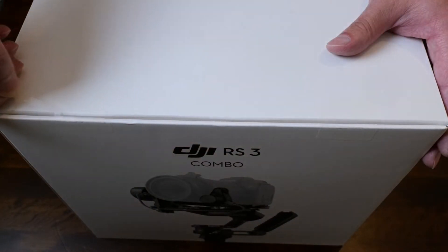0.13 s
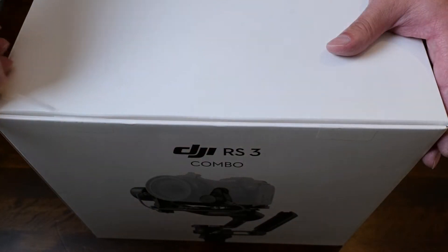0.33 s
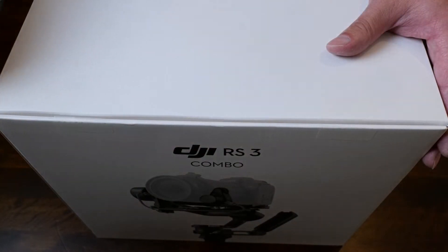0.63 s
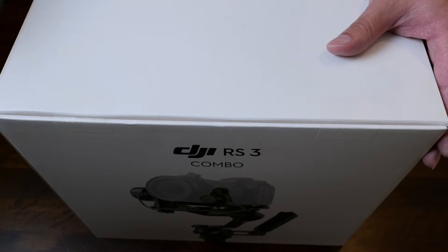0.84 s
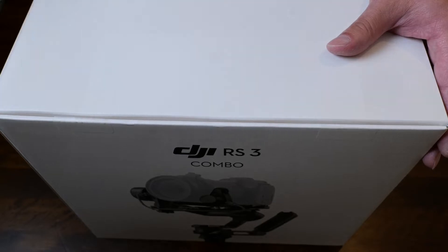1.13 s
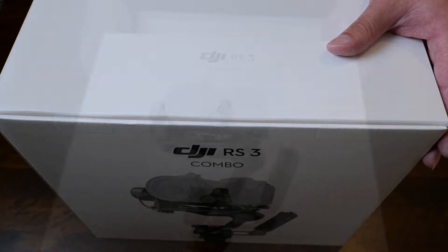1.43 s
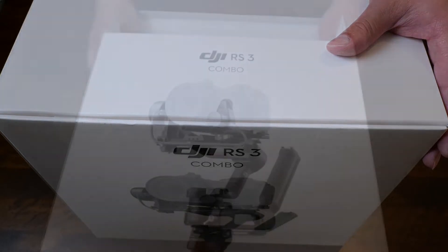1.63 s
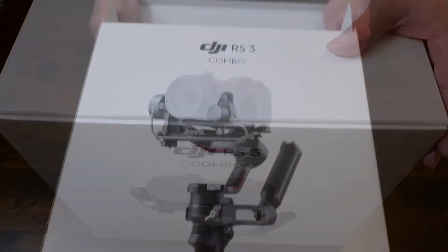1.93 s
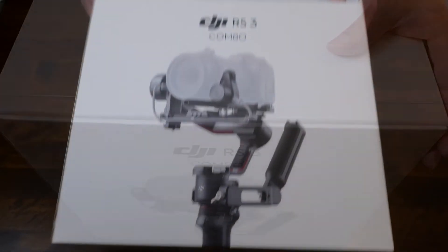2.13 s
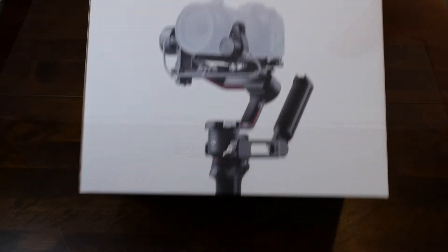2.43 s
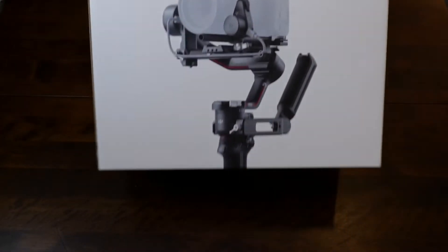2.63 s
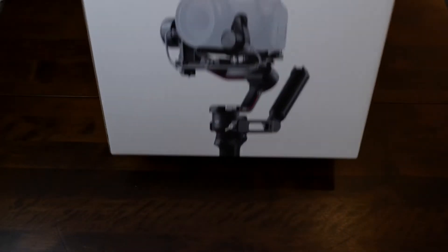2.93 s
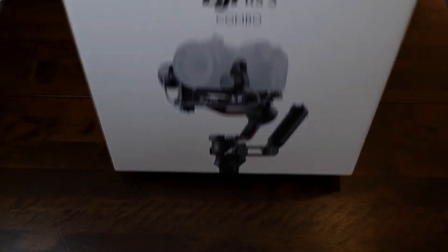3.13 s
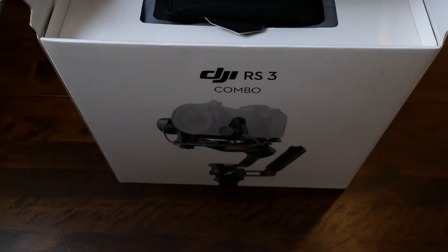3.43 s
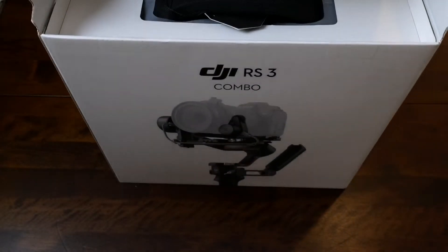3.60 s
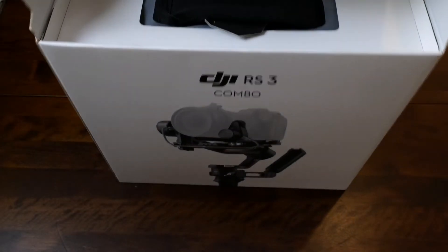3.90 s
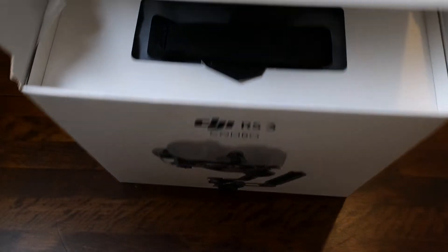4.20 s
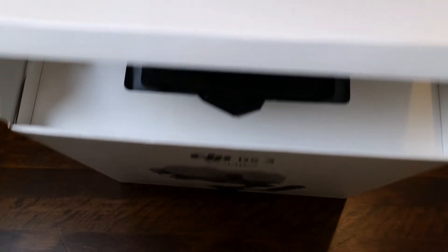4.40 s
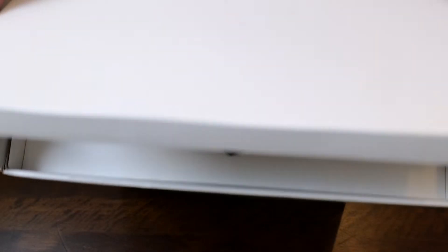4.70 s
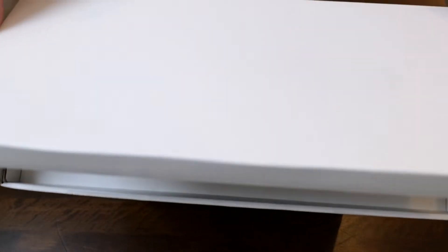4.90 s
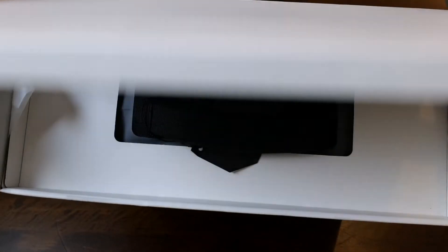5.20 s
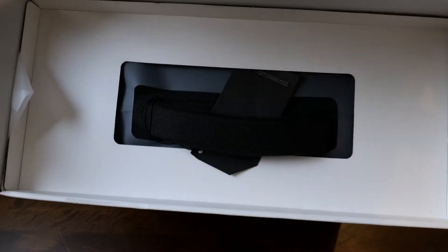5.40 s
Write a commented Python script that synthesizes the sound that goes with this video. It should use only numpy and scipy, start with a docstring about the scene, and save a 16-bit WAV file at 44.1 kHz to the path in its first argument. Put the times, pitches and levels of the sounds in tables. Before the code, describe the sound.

Close handling of a big carton in a quiet room: short scuffs, a jerky rub, a growing paper slide, a hollow thump, rustles and small ticks.

```python
"""A quiet room with a wooden floor: a large cardboard box is handled close by. Fingers scuff its face, a tight
lid slides off in two pulls and lets go with a thump, then hands brush the box and fold a flap over, with knocks
and light taps. Rubbing is friction noise coloured by panel resonances, with fibre fizz and a boom of the walls;
blows are sums of decaying modes, some with a noisy tail, and the squeak is wavering tones. A steady hush and
a short low rumble lie under."""
import sys
import numpy as np
from scipy import signal
from scipy.fft import rfft, irfft, next_fast_len
from scipy.io import wavfile
from scipy.ndimage import uniform_filter1d, map_coordinates

SR = 44100
rng = np.random.default_rng(int(sys.argv[2]) if len(sys.argv) > 2 else 0)


def generate_wav(sig):
    """Save sig (samples, or channels by samples) to the path in sys.argv[1] as 16-bit PCM at SR."""
    pcm = np.round(np.clip(np.atleast_2d(sig).T, -1, 1) * 32767).astype(np.int16)
    wavfile.write(sys.argv[1], SR, pcm)


N = 244755

# short rubs of the fingers and, in the second row, the noisy tail of a knock: (full strength at [s], rise [s],
# hold [s], scrape level [dB], fizz level [dB], place among the sets of resonances)
SCUFFS = [(.225, .068, 0.032, -36, -61.5, 0.04), (.42, 0.047, 0.012, -51.5, -58.5, .2),
          (.585, 0.057, .045, -36.5, -58.5, 0.93)]
SCUFF_FADE_DB_PER_S = 135  # after the hold
# broad colour of skin rubbing: (frequency [Hz], relative density [dB per Hz])
SKIN = [(210, -50), (350, -15), (680, -2), (885, -6.5), (1580, -1.5), (2180, -1), (3180, -4.5), (5660, -8),
        (7000, -15.5), (9100, -17.5), (15400, -120)]
# coherence of the box sounds between the channels: (frequency [Hz], left-right likeness)
ALIKE = [(60, 1), (180, 1), (550, 0.99), (1650, 0.8), (4970, 0.76), (15000, 0.33)]


def amp(db):
    """Definition of the decibel: amplitude gain of a level in dB."""
    return 10 ** (np.asarray(db) / 20)


def unit(x):
    """Normalization of power: x at rms 1."""
    return x / np.sqrt(np.mean(x ** 2) + 1e-20)


def along(points, hz):
    """Logarithmic frequency scale: (Hz, value) points interpolated along it."""
    f, v = np.transpose(points)
    return np.interp(np.log(hz + 1), np.log(f + 1), v)


def curves(rows):
    """Linear interpolation in time: one value per sample for each column after the time."""
    s, *cols = np.transpose(rows)
    return [np.interp(np.arange(N) / SR, s, c) for c in cols]


def wobble(rate, size=N):
    """Band-limited fluctuation: a smooth random curve through `rate` knots a second."""
    knots = rng.standard_normal(int(size * rate / SR) + 4)
    return map_coordinates(knots, [np.arange(size) * rate / SR])


def filtered(x, response):
    """Linear filtering: the spectrum of x times a response of frequency."""
    m = next_fast_len(x.shape[-1] + 8192)
    spectrum = rfft(x, m) * response(np.fft.rfftfreq(m, 1 / SR))
    return irfft(spectrum, m)[..., :x.shape[-1]]


def grit(n, spiky_db, colour, alike):
    """Noise as many tiny catches, of uneven size if spiky: coloured, partly coherent stereo of rms 1."""
    unevenness = amp(spiky_db * rng.exponential(size=n))
    catches = rng.standard_normal((2, n)) * unevenness

    def mid_side_gain(hz):
        turn = np.arccos(np.clip(along(alike, hz), -1, 1)) / 2
        return colour(hz) * [np.cos(turn), np.sin(turn)]

    mid, side = filtered(catches, mid_side_gain)
    return unit(np.array([mid + side, mid - side]))


def hush():
    """Stationary background noise: the coloured hush of the room, drifting slowly in level."""
    # (frequency [Hz], relative density [dB per Hz])
    quiet_colour = [(18, -88), (30, -54), (103, -19), (456, -41), (493, -2.5), (577, -9), (974, -8.5),
                    (1050, -3.5), (1300, -8.5), (3000, -15), (3800, -16), (4110, -17), (5200, -19.5),
                    (5920, -21.5), (15600, -30.5)]
    # (frequency [Hz], left-right likeness)
    quiet_alike = [(60, 0.62), (240, 1), (950, 0.82), (3770, 0.55), (15000, 0.33)]
    noise = grit(N, 0, lambda hz: amp(along(quiet_colour, hz)), quiet_alike)
    return amp(-58 + 0.82 * wobble(1.96)) * noise


def rumble():
    """Narrow-band noise: a Gaussian band of low rumble at the opening that stops short."""
    centre_hz, width_hz, level_db, end_s = 102, 34, -57.5, 0.29
    noise = rng.standard_normal(N)
    band = unit(filtered(noise, lambda hz: np.exp(-((hz - centre_hz) / width_hz) ** 2)))
    return amp(level_db) * band * np.clip((end_s - np.arange(N) / SR) / 0.015, 0, 1)


def boom():
    """Forced vibration: the walls of the box shake as it is handled, heard as low coloured noise."""
    # (time [s], mean level [dB])
    boom_path = [(0, -64), (.27, -58), (.33, -69), (.575, -52.5), (.8, -70), (1.16, -64), (1.21, -52),
                 (1.49, -72.5), (1.94, -66), (2.09, -57.5), (2.26, -52.5), (2.56, -44), (2.88, -45.5),
                 (3.1, -58), (3.3, -76), (3.7, -71), (4.03, -62), (4.72, -67), (5.0, -63.5), (5.27, -57),
                 (5.4, -70), (5.55, -59.5)]
    # (frequency [Hz], relative density [dB per Hz])
    boom_colour = [(18, -75), (30, -45), (54, -19), (125, -7), (172, 0.5), (231, -1.5), (258, 1),
                   (380, -1.5), (450, 2.5), (580, -23), (990, -120)]
    noise = grit(N, 0.71, lambda hz: amp(along(boom_colour, hz)), ALIKE)
    return amp(curves(boom_path)[0] + 2.5 * wobble(18)) * noise


def panel(modes, bed, bed_db):
    """Resonant response: squared gains of a rubbed panel's resonances add to those of a broad bed."""
    def gain(hz):
        peaks = 0
        for centre, width, db in modes:
            damping = (hz * width) ** 2
            peaks = peaks + amp(db) ** 2 * damping / ((centre ** 2 - hz ** 2) ** 2 + damping)
        edge = hz ** 4 / (hz ** 4 + 330 ** 4) / (1 + (hz / 6600) ** 12)
        return np.sqrt(peaks * edge + amp(along(bed, hz) + bed_db) ** 2)
    return gain


def flecked(x, patchy_db):
    """Surface roughness: rough spots of the cardboard lift or mute short stretches of single bands."""
    z = signal.stft(x, nperseg=256)[2]
    field = uniform_filter1d(rng.standard_normal(z.shape[1:]), size=4, axis=0)
    field = uniform_filter1d(field, size=5, axis=1)
    patchy = z * amp(patchy_db * unit(field))
    return unit(signal.istft(patchy, nperseg=256)[1][:, :x.shape[1]])


def stroke(gains, rings, bed, bed_db, spiky_db, judder_db):
    """Friction exciting resonances: noise through sets of panel modes, each at its own gain; the grip judders."""
    out, total = np.zeros((2, N)), np.linalg.norm(gains, axis=0)
    a, b = np.flatnonzero(total > 3e-5)[[0, -1]]  # audible span
    mixed = np.zeros((2, b - a))
    for gain, modes in zip(gains, rings):
        mixed += gain[a:b] / total[a:b] * grit(b - a, spiky_db, panel(modes, bed, bed_db), ALIKE)
    ends = signal.windows.tukey(b - a, 0.04)
    judder = amp(judder_db * wobble(45)[a:b])
    out[:, a:b] = ends * total[a:b] * judder * flecked(mixed, patchy_db=1.25)
    return out


def shares(place, count):
    """Power-preserving crossfade: gain of each set of resonances at a place between them."""
    distance = np.abs(np.clip(place, 0, count - 1) - np.arange(count)[:, None])
    return np.sqrt(np.clip(1 - distance, 0, 1))


def swells(rows, fade_db_per_s):
    """Exponential envelope: each row's noise, brief or long, lands, swells, holds and fades; gain 1 at full."""
    entry_db, landing_db_per_s = 15, 1200  # start below full strength; growth up to that start
    s, rise, hold = np.transpose(rows)[:3, :, None]
    early = s - np.arange(N) / SR
    swell_db = -entry_db * np.clip(early / rise, 0, 1)
    landing_db = -landing_db_per_s * np.clip(early - rise, 0, 1)
    fade_db = -fade_db_per_s * np.clip(-early - hold, 0, 5)
    return amp(swell_db + landing_db + fade_db)


def rubs(rows, fade_db_per_s, count):
    """Addition of powers: gains of each set of resonances and of the fizz under the rows of a table."""
    scrape_db, fizz_db, place = np.transpose(rows)[3:]
    power_shape = swells(rows, fade_db_per_s) ** 2
    scrape = np.sqrt((amp(scrape_db) * shares(place, count)) ** 2 @ power_shape)
    return scrape, np.sqrt(amp(fizz_db) ** 2 @ power_shape)


def sweep(rows, place, count):
    """Level following the motion: gains of each set of resonances and of the fizz under a long stroke."""
    t = np.arange(N) / SR
    scrape, fizz = amp(curves(rows)) * (t > rows[0][0]) * (t < rows[-1][0])
    return scrape * shares(place, count), fizz


def travel(passes):
    """Moving contact: as the lid travels, it reaches the next set of resonances at each pass [s]."""
    start_place, pass_s = 0.28, 0.06  # it sets off part of the way to the second set
    steps = [np.clip((np.arange(N) / SR - s) / pass_s + 0.5, 0, 1) for s in passes]
    return start_place * (1 - steps[0]) + sum(steps)


def scuffing():
    """Noise on a resonant plate: two finger scuffs and a knock's noisy tail; returns scrape and fizz gain."""
    # sets of panel resonances: (frequency [Hz], width [Hz], level [dB])
    scuff_modes = ([(794, 160, -9), (1567, 51, 0), (2540, 27, 4), (3060, 32, -0.5), (3840, 38, -8),
                   (4120, 23, -2.5), (4800, 100, -9), (5430, 43, -17)], [(710, 1000, -15.5),
                   (1470, 30, -2.5), (1714, 65, -3), (2320, 55, -12.5), (3040, 83, -5), (3245, 34, -3),
                   (3620, 50, -5.5), (3970, 80, -9), (4570, 110, -5.5), (5274, 23, -2), (6210, 80, -11)])
    gains, fizz_gain = rubs(SCUFFS, SCUFF_FADE_DB_PER_S, count=2)
    return stroke(gains, scuff_modes, SKIN, bed_db=-15.0, spiky_db=0, judder_db=0.7), fizz_gain


def squeak():
    """Stick-slip tones: a fingertip sings on the glossy face, wavering in pitch and breaking up in strength."""
    # (frequency [Hz], level on the first scuff [dB], level on the last scuff [dB])
    squeak_tones = [(1585, -4, -6), (2564, -3, -14), (3070, -7, -9), (3770, -7, -8), (4250, -7, -7),
                    (5200, -7, -5)]
    # (level in the first scuff [dB], level in the last scuff [dB])
    squeak_levels = [-44, -52]
    t = np.arange(SR) / SR
    tones = np.zeros(SR)
    for hz, first_db, second_db in squeak_tones:
        strength = amp(np.where(t < 0.48, first_db, second_db) + 4.4 * wobble(38.7, size=SR))
        cycles = hz * np.cumsum(1 + 0.0052 * wobble(49.2, size=SR)) / SR
        tones += strength * np.sin(2 * np.pi * cycles)
    shape = swells(SCUFFS, SCUFF_FADE_DB_PER_S)[::2, :SR]  # the two finger scuffs
    return np.pad(amp(squeak_levels) @ shape * tones, (0, N - SR))


def fizzing(fizz_gain):
    """Broadband friction noise: the fibres of the cardboard fizz, flickering in level."""
    # (frequency [Hz], relative density [dB per Hz])
    fizz_colour = [(3530, -8.5), (6000, -5), (8030, -14), (9580, -6), (12000, -7), (14600, -11),
                   (15600, -22)]
    noise = grit(N, 2.0, lambda hz: amp(along(fizz_colour, hz)), ALIKE)
    return fizz_gain * amp(1.5 * wobble(40)) * noise


def jerks():
    """Stick-slip: the level surges in dB when the grip lets go and fades as it catches again."""
    # (time [s], surge [dB])
    slips = [(0.194, 5.5), (0.57, 5), (.975, 1.5), (1.02, 6), (1.0995, 6.5), (1.172, 8.5), (1.211, 6),
             (1.304, 1), (1.325, 4), (1.347, 2), (3.785, 4), (4.627, 3)]
    t = np.arange(N) / SR
    return sum(surge_db * np.exp(-np.abs(t - s) / 0.0071) * (t > s) for s, surge_db in slips)


def ring(modes, t, scale, extra_db):
    """Modal superposition: decaying sines whose neighbours start in opposite directions."""
    hz, db, t60 = np.transpose(modes)[:, :, None]
    sign = (-1) ** np.arange(len(modes))[:, None]
    decay = amp(db + extra_db[:, None] - 60 * t / (t60 * scale))
    return np.sum(sign * decay * np.sin(2 * np.pi * hz * t), axis=0)


def knocks():
    """Impact excitation: blows ring walls and hollow; where and how hard each lands favours some modes."""
    # (time [s], walls level [dB], favoured pitch [octaves above 1 kHz], hollow level at 200 Hz [dB],
    # its depth [dB per octave downward], crack gain [dB], rise time constant [ms], decay scale)
    blow_rows = [ (0.3916, -16, -0.36, -26, -7, -20, 0.13, 0.44),
                 (1.346, -28.5, -0.37, -35, -5, -77, 5.1, 1.01), (1.93, -47, 1.1, -58, -9, -55, 2.7, 1.6),
                 (2.9202, -9, -0.92, -13, -4, -20.5, 0.15, 0.53),
                 (2.954, -30, -1.1, -22, 4.5, -70, 1.3, 0.56), (3.334, -33, -1.5, -44, -6, -60, 2, 0.7),
                 (3.402, -23.5, -1.25, -36, -3.5, -55, 2, 0.62),
                 (3.5102, -17, 0.13, -28.5, -7, -18.5, 0.28, 0.6),
                 (3.903, -35, -1.2, -49, 21.5, -62, 2.8, 0.33), (3.963, -48, 0.39, -52, 14, -55, 7.5, 0.62),
                 (4.33, -38, 0.68, -54, 5, -40, 0.76, 0.41), (4.5953, -15, -1.7, -62, 0, -25, 1.7, 0.43),
                 (4.5991, -15, 1.1, -37, 8.5, -9.5, 1.14, 0.57), (4.862, -56, -.5, -50.5, 3, -70, 6.1, 1.3),
                 (5.061, -60, -.5, -51, 10, -70, 4.5, 0.48)]
    # modes of the hollow: (frequency [Hz], relative level [dB], t60 at decay scale 1 [s])
    hollow_modes = [(126.6, -3.5, 0.13), (173.6, -6.5, 0.17), (199.6, -5, 0.15), (304.7, -1, 0.091)]
    # modes of the walls: (frequency [Hz], relative level [dB], t60 at decay scale 1 [s])
    wall_modes = [(445, -9, 0.063), (588, -7.5, 0.084), (768, -1.5, 0.033), (1060, -3, 0.034),
                  (1378, -7, 0.067), (1500, -12.5, 0.094), (1768, -0.5, 0.031), (2340, 0, 0.025),
                  (2574, 0.5, 0.039), (3130, -5, 0.027), (3563, 0, 0.037), (4440, -9.5, 0.028),
                  (5370, -3, 0.022)]
    out, t = np.zeros(N + SR), np.arange(SR // 3) / SR
    split = len(hollow_modes)
    chance_db = 0.84 * rng.standard_normal((len(blow_rows), split + len(wall_modes)))
    octaves = np.log2(np.transpose(wall_modes)[0] / 1000)
    below = np.log2(200 / np.transpose(hollow_modes)[0])
    for row, chance in zip(blow_rows, chance_db):
        s, walls_db, favoured, hollow_db, depth_db, crack_db, rise_ms, scale = row
        walls = ring(wall_modes, t, scale, walls_db - 4 * (octaves - favoured) ** 2 + chance[split:])
        hollow = ring(hollow_modes, t, scale, hollow_db + depth_db * below + chance[:split])
        snap = filtered(rng.standard_normal(len(t)), lambda hz: hz / 3000 / (1 + (hz / 5000) ** 4.5))
        crack = amp(crack_db - 60 * t / 0.02) * snap
        rise = 1 - np.exp(-1000 * t / rise_ms)
        out[round(s * SR):][:len(t)] += rise * (walls + hollow + crack)
    return out[:N]


def pulling():
    """Friction at a moving contact: the first pull on the lid; returns the scrape and the fizz gain."""
    # (time [s], scrape level [dB], fizz level [dB])
    pull_path = [(.86, -70, -72), (.944, -43.5, -53.5), (1.0, -41.5, -51.5), (1.14, -35, -44.5),
                 (1.17, -37.5, -45), (1.255, -31.5, -38), (1.345, -32.5, -39), (1.53, -69, -76)]
    # sets of panel resonances: (frequency [Hz], width [Hz], level [dB])
    pull_modes = [(555, 99, 1.5), (1290, 150, 1.5), (1920, 38, 6), (2440, 25, 8), (3230, 47, 9),
                  (4310, 17, 7.5), (4330, 15, -5), (5140, 250, -8), (5580, 29, -18)], [(1752, 40, 0),
                  (2460, 110, -19), (2660, 22, -2), (2760, 18, -6), (2980, 16, 2.5), (4230, 110, -11),
                  (4650, 120, -20), (5670, 37, -5), (5960, 46, -19)], [(431, 18, 2), (700, 78, -2.5),
                  (1896, 51, 1.5), (2670, 170, 0), (3200, 280, 2.5), (4630, 14, 4), (4780, 29, 1),
                  (5310, 30, 3.5), (5620, 180, 0)]
    gains, fizz_gain = sweep(pull_path, travel([1.15, 1.28]), count=3)
    return stroke(gains, pull_modes, SKIN, bed_db=-8, spiky_db=2.2, judder_db=1.1), fizz_gain


def sliding():
    """Friction of paper on paper: the second pull slides the lid off; returns the scrape and the fizz gain."""
    # (time [s], scrape level [dB], fizz level [dB])
    slide_path = [(1.87, -77, -86), (1.944, -44.5, -55), (2.02, -51.5, -64), (2.24, -38, -52.5),
                  (2.54, -32.5, -48), (2.59, -28.5, -49), (2.8, -29, -44.5), (2.915, -22.5, -44),
                  (2.95, -30.5, -45), (3.03, -46.5, -68)]
    # sets of panel resonances: (frequency [Hz], width [Hz], level [dB])
    slide_modes = [(530, 210, -1.5), (686, 74, -3), (870, 32, 0.5), (1060, 71, -2), (1240, 92, -7),
                   (2600, 580, -12.5), (5330, 1300, -13)], [(477, 38, 3.5), (670, 41, 3.5), (1036, 180, 0),
                   (1362, 24, 2.5), (1770, 40, -5), (2180, 62, -25), (2700, 51, -16)], [(615, 28, -1),
                   (1060, 100, 0), (1368, 27, 1), (2730, 37, -27), (3200, 51, -27), (4000, 47, -18),
                   (5620, 88, -18)], [(576, 110, -11), (1090, 26, -0.5), (1346, 43, 0), (1734, 52, -0.5),
                   (2094, 24, -9), (4380, 110, -23), (5950, 85, -22.5)]
    # broad colour of paper on paper: (frequency [Hz], relative density [dB per Hz])
    paper = [(210, -49), (350, -18.5), (647, -7), (791, -14), (1080, -4.5), (1240, -16), (1370, -7.5),
             (2380, -16.5), (7000, -34), (9100, -38), (15400, -120)]
    gains, fizz_gain = sweep(slide_path, travel([2.25, 2.565, 2.82]), count=4)
    return stroke(gains, slide_modes, paper, bed_db=-0.5, spiky_db=0.5, judder_db=0.14), fizz_gain


def brushing():
    """Friction of skin on paper: a long brush, touches and a long faint rustle; returns scrape and fizz gain."""
    # (time [s], scrape level [dB], fizz level [dB])
    brush_path = [(3.0, -50, -67), (3.06, -45.5, -47), (3.125, -42, -43), (3.17, -44.5, -48),
                  (3.35, -47, -38.5), (3.41, -38, -41), (3.455, -49.5, -52.5), (3.5, -47, -57),
                  (3.53, -41, -48), (3.58, -45, -42), (3.64, -51.5, -47.5), (3.71, -56, -47.5),
                  (3.76, -62, -63)]
    # touches and a long faint rustle: (full strength at [s], rise [s], hold [s], scrape level [dB],
    # fizz level [dB], place among the sets)
    touches = [(3.76, .012, 0.05, -54, -62, 1), (3.79, 0.017, 0.039, -64, -56, 0.87),
               (3.85, .05, 0.56, -60, -63, 0.59), (3.962, 0.017, 0.04, -46.5, -54, 0.85),
               (4.31, 0.031, .015, -53.5, -70, 0.56)]
    # sets of panel resonances: (frequency [Hz], width [Hz], level [dB])
    brush_modes = [(580, 119, -19), (835, 19, -6), (1470, 34, 0.5), (1797, 47, 2.5), (2510, 140, -10),
                   (3820, 41, -6), (5470, 220, -11)], [(828, 13, 12), (1484, 116, 14.5), (2130, 120, 4),
                   (2530, 25, 4), (3160, 130, 2.5), (3830, 89, -11), (5440, 64, -17)]
    brush, brush_fizz = sweep(brush_path, 0.25, count=2)  # fixed blend of the two sets
    touch, touch_fizz = rubs(touches, 160, count=2)  # fade in dB per s
    gains = np.hypot(brush, touch)
    scrape = stroke(gains, brush_modes, SKIN, bed_db=-9.5, spiky_db=2.5, judder_db=0.2)
    return scrape, np.hypot(brush_fizz, touch_fizz)


def folding():
    """Noise on a light plate: hands rub the flap, a knock's tail hisses, a tick; returns scrape and fizz gain."""
    # rubs of the flap, a long faint rustle, the hissing tail of a knock and a small bright tick:
    # (full strength at [s], rise [s], hold [s], scrape level [dB], fizz level [dB], place among the sets)
    folds = [(4.53, 0.054, 0.055, -50.5, -56.5, 0), (4.603, 0.028, .006, -31, -43, 0.14),
             (4.64, .02, 0.026, -43.5, -49.5, 0.13), (4.73, .05, .8, -58, -64, 1.6),
             (4.8, 0.053, .03, -48.5, -52, 0.94), (4.85, 0.048, 0.015, -51, -48, 1.4),
             (4.905, 0.069, 0.023, -44, -56, 1.9), (5.065, .035, .04, -51, -63, 2),
             (5.19, 0.078, 0.034, -44.5, -51.5, 1.87), (5.26, 0.052, 0.038, -50, -56.5, 1.3),
             (5.521, .004, .004, -62, -56, 1.7), (5.54, 0.04, .05, -57, -66, 1.8)]
    # sets of flap resonances: (frequency [Hz], width [Hz], level [dB])
    fold_modes = ([(705, 85, 4), (1520, 75, 6), (1740, 78, 2.5), (2220, 83, 5.5), (2410, 65, -3),
                  (3700, 84, -26), (5260, 200, -22)], [(818, 17, -10), (1434, 40, -2), (2130, 37, -11),
                  (3190, 45, -4.5), (3600, 87, -11), (5620, 44, -3.5)], [(580, 69, 0.5), (756, 38, 1),
                  (1040, 150, -2), (1510, 80, -14), (1760, 170, 1.5), (2450, 100, -24), (3300, 200, -21)])
    gains, fizz_gain = rubs(folds, 226, count=3)  # fade in dB per s
    return stroke(gains, fold_modes, SKIN, bed_db=-8.5, spiky_db=0.5, judder_db=1.5), fizz_gain


def taps():
    """Impact on a light plate: fingers and corners tick the flap, whose modes ring briefly."""
    # (time [s], level [dB], rise time constant [ms], decay scale)
    tap_rows = [(4.879, -37.5, 1, 0.67), (4.893, -44, 2, 1), (4.947, -43, 2, 0.9),
                (4.985, -43.5, 1.7, 0.63), (5.049, -45.5, 2.3, 1), (5.075, -37, 2.3, 0.75),
                (5.212, -34.5, 1.5, 0.81), (5.24, -49, 2, 0.59), (5.2674, -31.5, 0.56, 0.48),
                (5.315, -57, 2, 0.75)]
    # (frequency [Hz], relative level [dB], t60 at decay scale 1 [s])
    flap_modes = [(547, -11, 0.047), (750, -1, 0.038), (1052, 2, 0.048), (1236, -11, 0.045),
                  (1530, -11, 0.042), (1718, 2.5, 0.041), (2480, -13, 0.044), (3260, -17, .03)]
    out, t = np.zeros(N + SR), np.arange(SR // 5) / SR
    chance_db = 2.8 * rng.standard_normal((len(tap_rows), len(flap_modes)))
    for (s, db, rise_ms, scale), chance in zip(tap_rows, chance_db):
        rise = 1 - np.exp(-1000 * t / rise_ms)
        out[round(s * SR):][:len(t)] += rise * ring(flap_modes, t, scale, db + chance)
    return out[:N]


def rubbing():
    """Superposition of noise sources: scrapes and fizz surge with the grip while the walls boom along."""
    scrapes, fizz_gains = zip(scuffing(), pulling(), sliding(), brushing(), folding())
    fizz = fizzing(np.linalg.norm(fizz_gains, axis=0))
    return amp(jerks()) * (sum(scrapes) + fizz) + boom()


def room(x):
    """Reverberation: convolution with a noise tail in which each frequency dies at its own speed."""
    # (frequency [Hz], t60 [s])
    room_decay = [(150, 0.21), (1000, 0.21), (4000, 0.19), (12000, 0.12)]
    hz, t, z = signal.stft(rng.standard_normal((2, SR // 2)), SR, nperseg=256)
    decay = amp(-60 * t / along(room_decay, hz)[:, None])
    tail = signal.istft(z * decay, SR, nperseg=256)[1]
    mid, side = tail / np.linalg.norm(tail[0])
    side = 0.47 * filtered(side, lambda hz: np.clip(hz / 1500, 0, 1))  # bass is alike left and right
    delayed = np.pad(x, (130, 0))[None]  # delay in samples
    return signal.fftconvolve(delayed, np.array([mid + side, mid - side]), axes=1)[:, :N]


def scene():
    """Intensity stereo: box sounds lean left or right with the hands; room answer, hush and rumble add."""
    # where the hands work: (time [s], left minus right level [dB])
    lean_path = [(0.0, 0.5), (0.42, 1), (0.89, 0.0), (3.37, -0.5), (3.45, -1), (4.4, 0.0), (4.5, -2.5),
                 (5.18, 1), (5.55, 0)]
    blows = knocks() + taps() + squeak()
    lean_db = curves(lean_path)[0] / 2
    box = (rubbing() + blows) * amp([lean_db, -lean_db])
    return box + amp(-4.0) * room(blows) + hush() + rumble()


def record(dry):
    """Band limiting: a steep fourth-order high-pass cuts the deep bass; nothing passes from 15.6 kHz up."""
    def response(hz):
        x = hz / 105  # corner in Hz
        low_cut = (1j * x) ** 2 / (1 + 1.2j * x - x ** 2)
        return low_cut ** 2 * (hz < 15600)
    return filtered(dry, response)


dry = scene()
out = record(dry)
generate_wav(out)
```